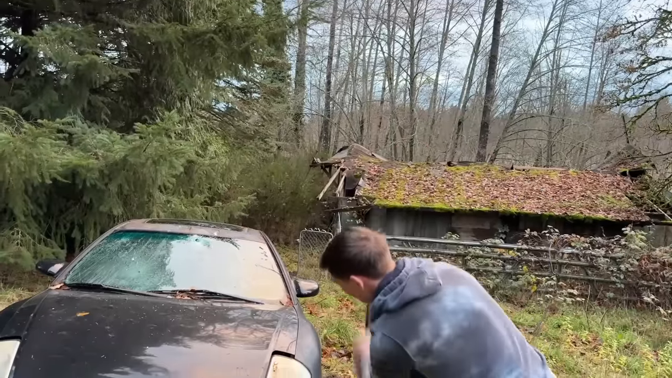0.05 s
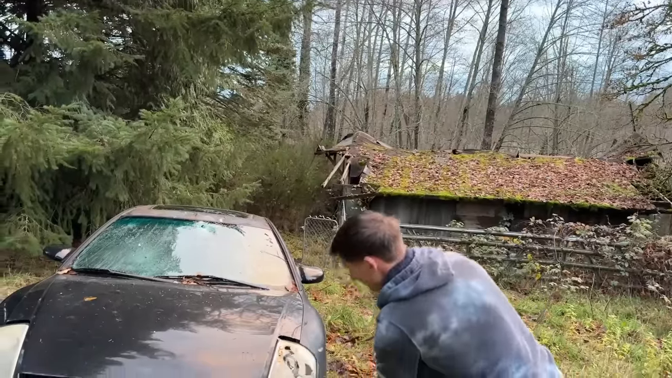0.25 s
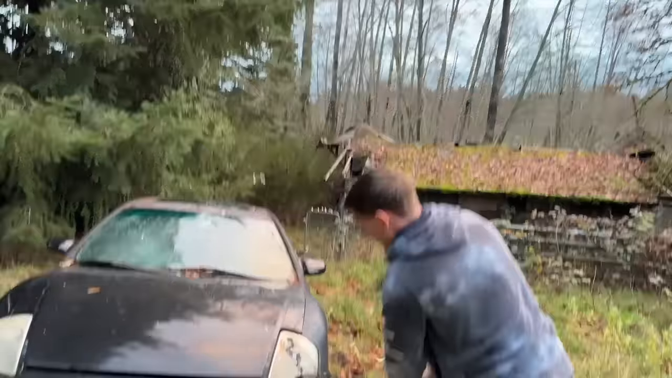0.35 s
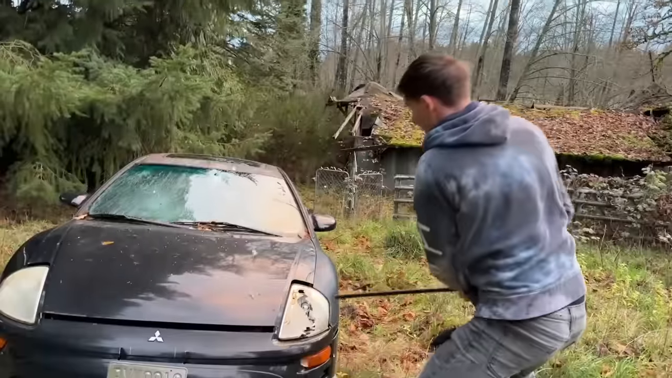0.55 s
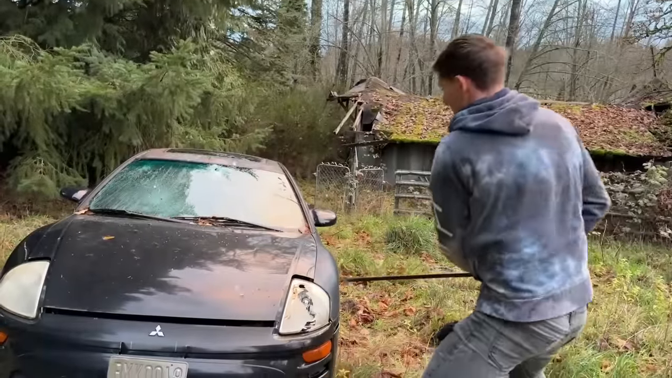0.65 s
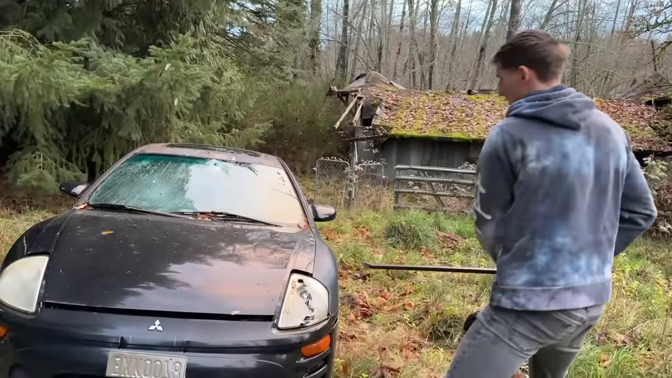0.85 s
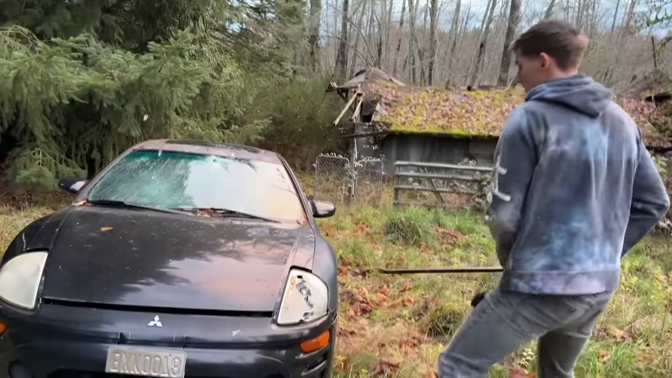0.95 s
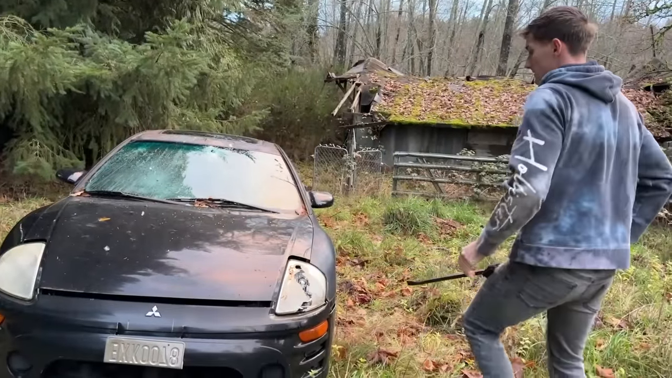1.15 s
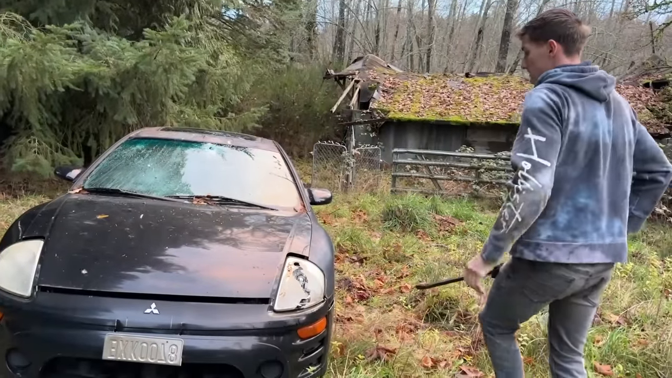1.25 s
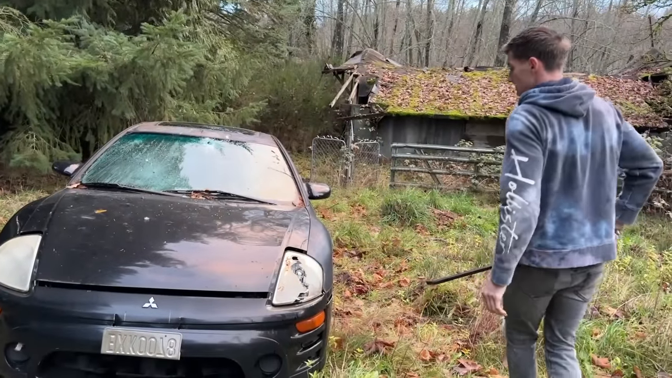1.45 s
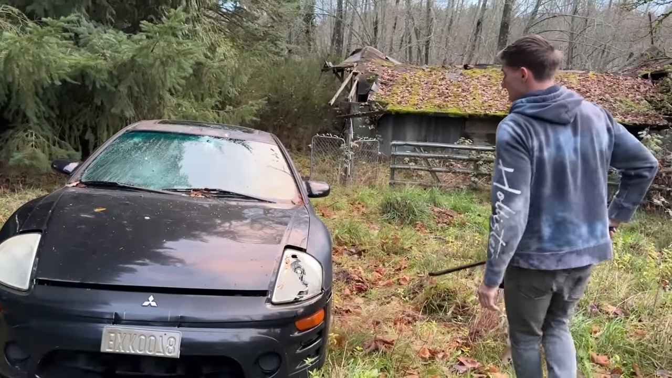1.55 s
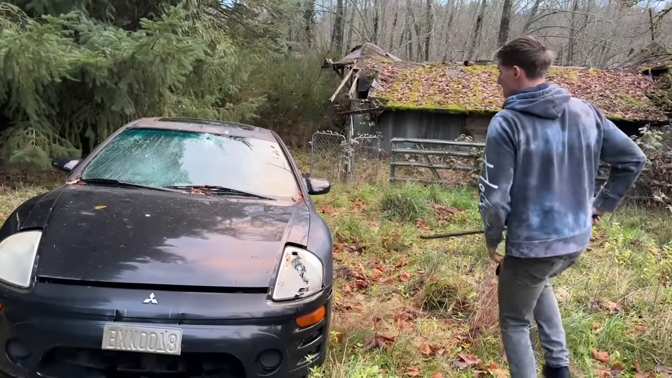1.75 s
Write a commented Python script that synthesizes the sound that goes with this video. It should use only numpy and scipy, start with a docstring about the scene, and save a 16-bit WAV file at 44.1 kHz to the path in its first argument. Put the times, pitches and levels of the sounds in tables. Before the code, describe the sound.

One hard crowbar blow crunches a car's windscreen, scattering glass crumbs, then a fragment clatters down

```python
"""Crowbar on a windscreen

A steel crowbar hits a car windscreen once, outdoors: a brief burst of crackling clicks, a low sine thump,
and the ring of pane and bar as decaying sines. Trees scatter the blow back as dense noise tails.
Glass dust sprays as shaped clicks and crumbs trickle as tiny sines. A second later a fragment lands and bounces,
probably on the bonnet; shaped noise and clicks make the clothes and grass rustle as the man steps back."""
import sys
import numpy as np
from scipy import signal
from scipy.fft import rfft, irfft, next_fast_len
from scipy.io import wavfile

SR = 44100
rng = np.random.default_rng(int(sys.argv[2]) if len(sys.argv) > 2 else 0)


def master(y):
    """Save y as 16-bit WAV."""
    cut = np.clip(np.atleast_2d(y).T, -1, 1)
    pcm = np.round(cut * 32767)  # scale
    wavfile.write(sys.argv[1], SR, pcm.astype(np.int16))


N = 79380
T = np.arange(N) / SR  # seconds

# Steady outdoor rush. Each row: frequency in Hz, relative level in dB per Hz.
OUTDOORS_COLOUR = [(20, -2.5), (45, 0), (75, 6.5), (150, -4.5), (400, -2.5), (900, -3), (1400, -9),
                   (2200, -21.5), (6000, -26), (11000, -28.5), (16000, -34)]
OUTDOORS_DB = -66

# Clothes and grass brush. Each row: centre in seconds, level in dB, half length in seconds.
BRUSHES = [(.045, -62, 0.023), (.12, -61.5, 0.024), (.95, -70.5, 0.038), (1.29, -72.5, 0.044),
           (1.5, -77.5, 0.062), (1.605, -69.5, 0.039)]
# Colour of cloth and grass. Each row: frequency in Hz, relative level in dB per Hz.
CLOTH_COLOUR = [(200, -10), (1500, -10.5), (3000, -5), (6000, -0.5), (10000, -4.5), (16000, -12.5)]
# Twigs and leaves snap underfoot. Each row: start in seconds, snap level in dB, thud level in dB, t60 in seconds.
SNAPS = [(.1000, -46, -36.5, 0.02), (.749, -65, -62.5, 0.11), (.980, -58, -57.5, 0.067),
         (1.476, -61.5, -62, 0.086), (1.648, -61.5, -73, .02), (1.7056, -56.5, -48, .016),
         (1.737, -84, -60.5, .03), (1.759, -86, -56, 0.019)]
# Bright part of a snap. Each row: frequency in Hz, relative level in dB per Hz.
SNAP_COLOUR = [(500, -35.5), (2200, 0.5), (3200, -0.5), (5200, 1.5), (8000, -8.5), (16000, -21)]
# Dull part of a snap. Each row: frequency in Hz, relative level in dB per Hz.
THUD_COLOUR = [(60, -18.5), (180, -6.5), (350, -2), (900, -1), (1300, -14.5), (2500, -25.5), (16000, -53)]

# The bar swishes on its way down. Each row: centre in seconds, level in dB, half length in seconds.
SWISHES = [(.02, -55.5, 0.023), (.125, -53.5, .025)]
# Colour of the swish. Each row: frequency in Hz, relative level in dB per Hz.
SWISH_COLOUR = [(100, -7.5), (300, 2), (700, -5), (1400, -15.5), (4000, -26.5), (16000, -55)]
# Air from the swing buffets the microphone. Each row: centre in seconds, level in dB, half length in seconds.
BUFFETS = [(.028, -44.5, .02), (.066, -41, .008), (.110, -39, .008), (.318, -47.5, .02)]
# Colour of the buffets. Each row: frequency in Hz, relative level in dB per Hz.
BUFFET_COLOUR = [(15, -0.5), (40, -1), (110, -0.5), (200, -13.5), (400, -26.5), (1400, -48.5), (16000, -85)]

# Returns from the trees. Each row: delay after the hit in seconds, level in dB, rise in seconds, bass t60 in seconds.
ECHOES = [(.03, -35, 0.03, 1), (0.169, -37, 0.022, 0.48), (.375, -51, 0.015, .6)]
# Colour of the returns. Each row: frequency in Hz, relative level in dB per Hz.
TREES_COLOUR = [(50, -16), (170, -8), (340, 5.5), (480, -1), (700, 1.5), (1200, -3.5), (1700, -9.5),
                (2100, -7), (3400, -7), (6000, -11.5), (9000, -19), (16000, -31.5)]
TREES_TREBLE_SHARE = 0.82  # treble t60 over bass t60
RING_ECHO_DB = -12.5  # the ringing within the returns

# Chips and other small hard things tick. Each row: start in seconds, pitch in Hz, level in dB, t60 in seconds.
TICKS = [(.573, 9700, -63, .04), (.618, 9400, -64, .05), (.620, 5700, -59, .05), (.642, 11700, -63, .04),
         (.644, 5200, -62, .04), (.670, 5300, -63, .04), (.720, 6300, -69, .06), (.754, 6800, -66, .05),
         (.808, 7100, -64, .04), (.838, 3600, -69, .06), (1.257, 1900, -55, .022), (1.257, 3650, -60, .018),
         (1.7095, 5100, -47, .014)]
TICK_WIDTH = 0.11  # bandwidth over pitch

# A fragment lands and bounces. Each row: start in seconds, clatter level in dB, panel level in dB, rise in seconds.
BOUNCES = [(1.109, -38, -43, 0.0051), (1.171, -45.5, -45.5, .002), (1.292, -55.5, -60, 0.0061),
           (1.319, -51, -54, 0.0079)]
# Bright clatter. Each row: frequency in Hz, relative level in dB per Hz.
CLATTER_COLOUR = [(300, -29), (1200, 6.5), (2600, -2), (5500, 4.5), (8000, -1.5), (11000, -11),
                  (16000, -26)]
# Duller panel. Each row: frequency in Hz, relative level in dB per Hz.
PANEL_COLOUR = [(80, -48), (260, -4), (450, -0.5), (660, 4), (1250, -4), (2000, -14.5), (6000, -36),
                (16000, -61)]
CLATTER_T60_S, PANEL_T60_S = .075, .18

CRUMB_FROM_S, CRUMBS_PER_S, CRUMB_MEAN_T60_S = .22, 400, .01
CRUMB_LOW_HZ, CRUMB_HIGH_HZ, CRUMB_DB_PER_OCTAVE = 4200, 10500, -3
CRUMB_FIRST_DB, CRUMB_FADE_DB_PER_S, CRUMB_SCATTER_DB = -38, 68.5, 9

# Fine glass dust sprays onto the car. Each row: centre in seconds, level in dB, half length in seconds.
SPRAYS = [(.365, -44.5, 0.0294), (.44, -53, 0.058), (.56, -73, 0.053)]
# Colour of the dust. Each row: frequency in Hz, relative level in dB per Hz.
SPRAY_COLOUR = [(1000, -20), (3400, -7), (4500, -6), (5500, -1.5), (7000, -7.5), (9000, -10.5),
                (11000, -18.5), (16000, -21)]

HIT_S = .1436
# Modes of pane and bar. Each row: frequency in Hz, level in dB, t60 in seconds.
RINGS = [(197, -26, .3), (218, -28, .28), (369, -27, .36), (516, -26, .33), (630, -31, .36),
         (697, -26, .27), (1003, -28, .22), (1073, -27, .2), (1170, -25, .27), (1292, -23, .26),
         (1732, -29, .26), (2086, -19, .2), (2331, -15, .15), (2416, -16, .14), (2613, -20, .14),
         (2732, -19, .16), (3072, -19, .18), (3480, -21, .16), (3638, -22, .18), (4038, -23, .16),
         (4760, -24, .17), (4945, -25, .2), (5972, -21, .17), (6205, -21, .18), (6480, -20, .13),
         (7125, -25, .15), (8599, -26, .13)]
RING_RISE_S = 0.0058
# Colour of the breaking pane. Each row: frequency in Hz, relative level in dB per Hz.
GLASS_COLOUR = [(40, -21), (120, -6.5), (220, -7.5), (450, -6), (720, -3), (1300, -4), (1560, -6.5),
                (1660, -21.5), (1800, -9), (1980, -9.5), (2100, -3.5), (2220, -12), (2340, 1), (2500, -5.5),
                (3100, -0.5), (3800, -3.5), (4800, -6), (6300, -2.5), (9000, -13.5), (12500, -15.5),
                (16000, -21)]
CRACK_DB, CRACKS_PER_S, CRACK_SCATTER_DB = -4.5, 9000, 2.5
CRACK_START, CRACK_RISE_S, CRACK_HOLD_S, CRACK_T60_S = 0.46, .007, 0.009, .085  # start: share of full strength
# The brightest splitting. Each row: frequency in Hz, relative level in dB per Hz.
SPLIT_COLOUR = [(1000, -25), (4000, -8.5), (6500, -0.5), (12000, 0), (16000, -5.5)]
SPLIT_DB, SPLIT_RISE_S, SPLIT_T60_S = -14.5, 0.0073, .06  # comes at peak load
BULGE_HZ, BULGE_DB, BULGE_DELAY_S, BULGE_HALF_S = 207.4, -12.5, .018, .0035  # the pane gives way under the bar
# The car's after-ring. Each row: frequency in Hz, relative level in dB per Hz.
SHELL_COLOUR = [(50, -16.5), (130, -10.5), (260, -1), (750, 2), (1300, -4), (1650, -12.5), (2400, -7),
                (3600, -2), (4800, -12), (7000, -11), (10000, -15.5), (16000, -30.5)]
SHELL_DB, SHELL_RISE_S, SHELL_LOW_T60_S, SHELL_HIGH_T60_S = -18, 0.026, .4, .26

CEILING, TOP_HZ = 0.96, 15750  # full scale is 1


def undb(db):
    """Decibels to gain."""
    return 10 ** (np.asarray(db) / 20)


def colour(x, points):
    """Causal filter through (Hz, dB) points that keeps the power of white noise."""
    size = 2 * next_fast_len(N)
    hz, db = np.array(points).T
    bins = np.fft.rfftfreq(size, 1 / SR)
    gain = undb(np.interp(np.log(bins + 1), np.log(hz), db))
    # folding the cepstrum gives minimum phase, so nothing sounds early
    cepstrum = irfft(np.log(gain / np.sqrt(np.mean(gain ** 2))))
    cepstrum[1:size // 2] *= 2
    cepstrum[size // 2 + 1:] = 0
    return irfft(rfft(x, size) * np.exp(rfft(cepstrum)), size)[:N]


def noise():
    """White noise, rms 1."""
    return rng.standard_normal(N)


def clicks(rate, scatter_db):
    """Random clicks of uneven size, rms 1; rate is per second."""
    happens = rng.random(N) < rate / SR
    x = happens * np.sign(noise()) * undb(scatter_db * noise())
    return x / np.std(x)


def burst(start, rise, t60, hold=0, first=0):
    """Envelope: straight rise from a first share, hold, exponential release."""
    age = T - start
    attack = np.clip(first + (1 - first) * age / rise, 0, 1)
    release = np.exp(-np.log(1000) * np.maximum(age - rise - hold, 0) / t60)
    return (age >= 0) * attack * release


def swells(rows):
    """Envelope of smooth swells from (s, dB, half length s) rows."""
    return sum(undb(db) * np.exp(-.5 * ((T - at) / half) ** 2) for at, db, half in rows)


def tail(start, rise, low_t60, high_t60):
    """Dense ringing whose decay time goes from bass to treble, band by band."""
    edges = [0, 250, 500, 1000, 2000, 4000, 8000, SR]  # Hz
    spectrum, hz = rfft(noise()), np.fft.rfftfreq(N, 1 / SR)
    t60s = np.geomspace(low_t60, high_t60, len(edges) - 1)
    out = np.zeros(N)
    for low, high, t60 in zip(edges, edges[1:], t60s):
        band = irfft(spectrum * ((hz >= low) & (hz < high)), N)
        out += band * burst(start, rise, t60)
    return out


def outdoors():
    """Faint, steady distant rush of coloured noise."""
    return undb(OUTDOORS_DB) * colour(noise(), OUTDOORS_COLOUR)


def movement():
    """Each snap underfoot pairs bright clicks with a dull thud; cloth and grass brush in soft swells."""
    snap = sum(undb(db) * burst(at, 0.0015, t60) for at, db, _, t60 in SNAPS)
    thud = sum(undb(db) * burst(at, 0.003, t60) for at, _, db, t60 in SNAPS)
    brush = colour(swells(BRUSHES) * clicks(6000, 4), CLOTH_COLOUR)
    return colour(snap * clicks(8900, 3), SNAP_COLOUR) + colour(thud * noise(), THUD_COLOUR) + brush


def swing():
    """The bar swishes through the air, and puffs buffet the microphone."""
    swish = colour(swells(SWISHES) * noise(), SWISH_COLOUR)
    return swish + colour(swells(BUFFETS) * noise(), BUFFET_COLOUR)


def trees():
    """The crash and its ringing come back smeared from the shed and the wood's edge."""
    returns = np.zeros(N)
    for delay, db, rise, t60 in ECHOES:
        returns += undb(db) * tail(HIT_S + delay, rise, t60, t60 * TREES_TREBLE_SHARE)
    ring = rings()[int(HIT_S * SR):]
    ring_echo = signal.fftconvolve(returns, ring / np.linalg.norm(ring))[:N]
    return colour(returns, TREES_COLOUR) + undb(RING_ECHO_DB) * ring_echo


def ticks():
    """Chips and other small hard things tick and tinkle, each noise through one resonance."""
    out = np.zeros(N)
    for at, hz, db, t60 in TICKS:
        b, a = signal.iirpeak(hz, 1 / TICK_WIDTH, fs=SR)
        # a narrow resonance passes little noise: bring it back to about rms 1
        ring = signal.lfilter(b, a, noise()) / np.sqrt(np.pi * TICK_WIDTH * hz / SR)
        out += undb(db) * burst(at, 0.00088, t60) * ring
    return out


def fragment():
    """Each landing is a bright clatter and a duller ring of the panel."""
    clatter = sum(undb(db) * burst(at, rise, CLATTER_T60_S) for at, db, _, rise in BOUNCES)
    panel = sum(undb(db) * burst(at, rise, PANEL_T60_S) for at, _, db, rise in BOUNCES)
    return colour(clatter * clicks(8000, 3.5), CLATTER_COLOUR) + colour(panel * noise(), PANEL_COLOUR)


def crumbs():
    """Tiny bits of glass tinkle down, each a sine at its own pitch, on the whole ever fainter."""
    out, age = np.zeros(2 * N), T[:SR // 10]
    for k, (when, pitch, size, length) in enumerate(rng.random((400, 4))):
        after = (k + when) / CRUMBS_PER_S
        hz = CRUMB_LOW_HZ * (CRUMB_HIGH_HZ / CRUMB_LOW_HZ) ** pitch
        db = CRUMB_FIRST_DB - CRUMB_FADE_DB_PER_S * after
        db += CRUMB_DB_PER_OCTAVE * np.log2(hz / CRUMB_LOW_HZ)
        db += CRUMB_SCATTER_DB * (2 * size - 1)
        t60 = CRUMB_MEAN_T60_S * (.5 + length)
        at = min(int((CRUMB_FROM_S + after) * SR), N)
        out[at:at + len(age)] += undb(db - 60 * age / t60) * np.sin(2 * np.pi * hz * age)
    return out[:N]


def spray():
    """A hiss of countless grains: dense clicks under smooth swells."""
    return colour(swells(SPRAYS) * clicks(6100, 4.0), SPRAY_COLOUR)


def rings():
    """Pane and bar ring in their modes, each a decaying sine."""
    out = np.zeros(N)
    for hz, db, t60 in RINGS:
        out += undb(db) * burst(HIT_S, RING_RISE_S, t60) * np.sin(2 * np.pi * hz * (T - HIT_S))
    return out


def windscreen():
    """Cracks strengthen as the bar sinks in and the pane bulges; the car body rings on."""
    load = burst(HIT_S, CRACK_RISE_S, CRACK_T60_S, CRACK_HOLD_S, CRACK_START)
    cracks = undb(CRACK_DB) * colour(load * clicks(CRACKS_PER_S, CRACK_SCATTER_DB), GLASS_COLOUR)
    peak_load = burst(HIT_S, SPLIT_RISE_S, SPLIT_T60_S)
    split = undb(SPLIT_DB) * colour(peak_load * clicks(CRACKS_PER_S, CRACK_SCATTER_DB), SPLIT_COLOUR)
    bulge = swells([(HIT_S + BULGE_DELAY_S, BULGE_DB, BULGE_HALF_S)])
    thump = bulge * np.sin(2 * np.pi * BULGE_HZ * (T - HIT_S))
    after_ring = tail(HIT_S, SHELL_RISE_S, SHELL_LOW_T60_S, SHELL_HIGH_T60_S)
    shell = undb(SHELL_DB) * colour(after_ring, SHELL_COLOUR)
    return cracks + split + thump + rings() + shell


def scene():
    """All sources at one microphone."""
    surroundings = outdoors() + movement() + swing() + trees()
    debris = ticks() + fragment() + crumbs() + spray()
    return (surroundings + debris + windscreen())[None]


def record(dry):
    """The microphone rounds the loudest peaks; the top is cut."""
    rounded = CEILING * np.tanh(dry / CEILING)
    top_cut = signal.ellip(10, .2, 70, TOP_HZ, fs=SR, output="sos")
    return signal.sosfilt(top_cut, rounded)


dry = scene()
out = record(dry)
master(out)
```